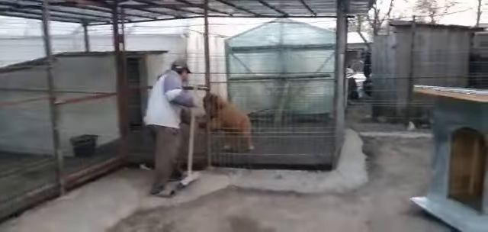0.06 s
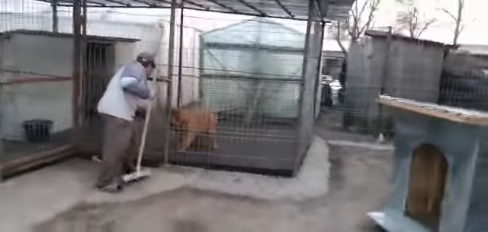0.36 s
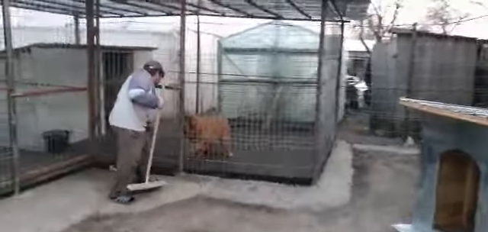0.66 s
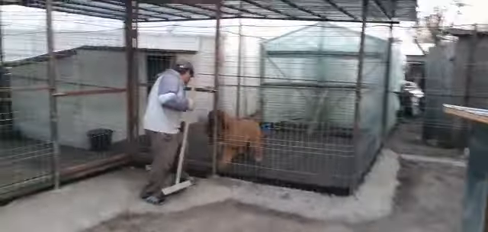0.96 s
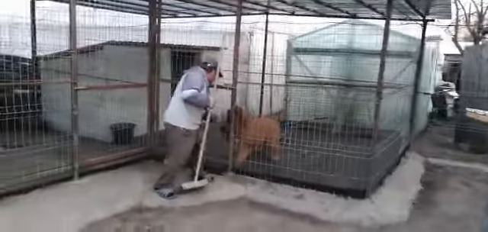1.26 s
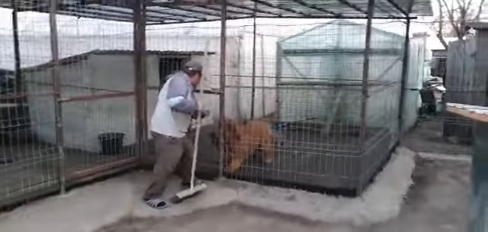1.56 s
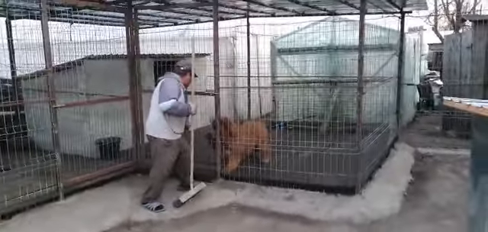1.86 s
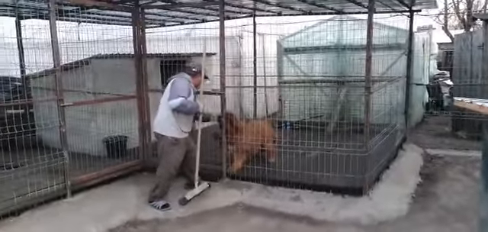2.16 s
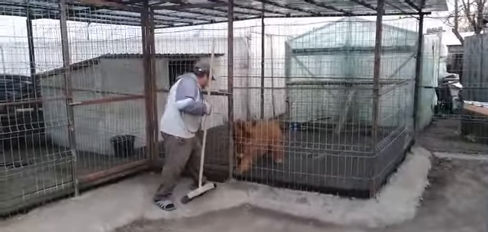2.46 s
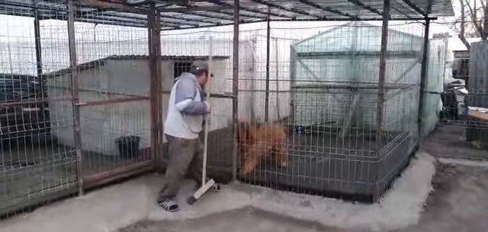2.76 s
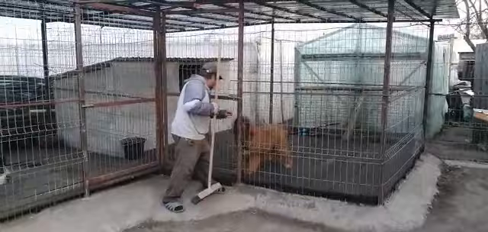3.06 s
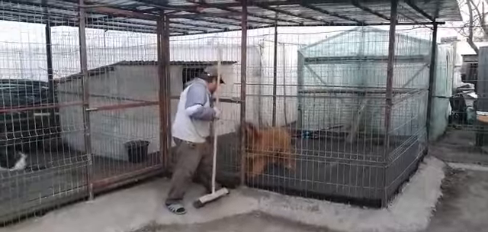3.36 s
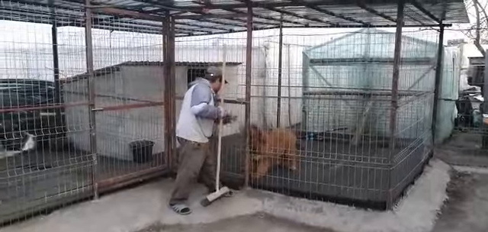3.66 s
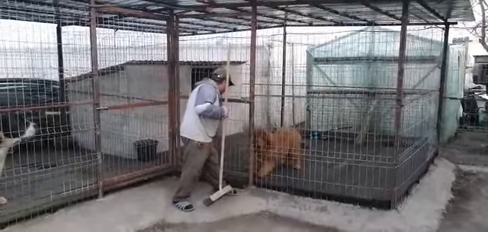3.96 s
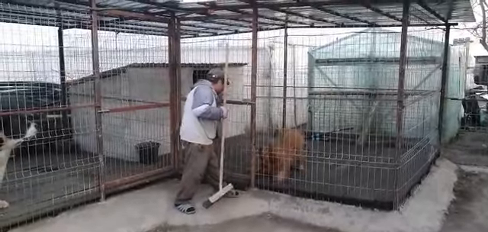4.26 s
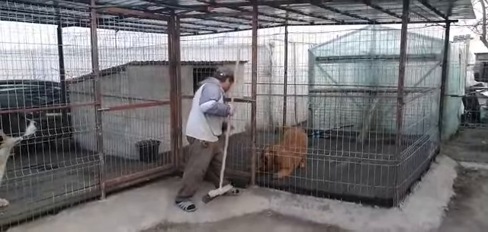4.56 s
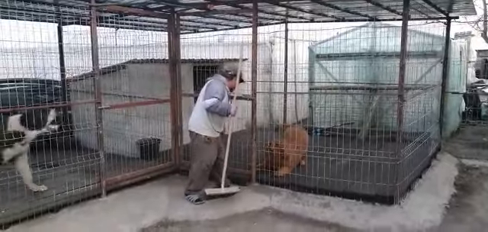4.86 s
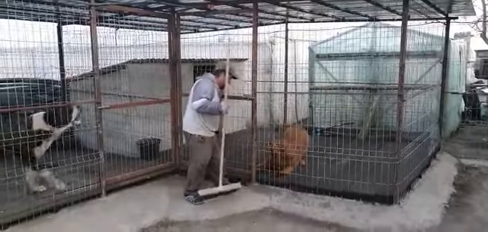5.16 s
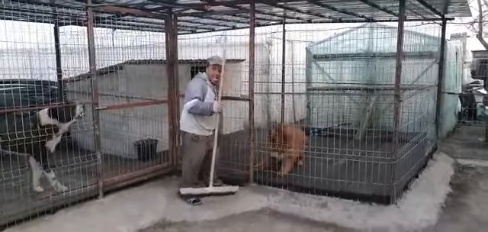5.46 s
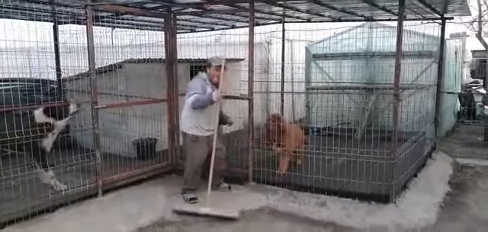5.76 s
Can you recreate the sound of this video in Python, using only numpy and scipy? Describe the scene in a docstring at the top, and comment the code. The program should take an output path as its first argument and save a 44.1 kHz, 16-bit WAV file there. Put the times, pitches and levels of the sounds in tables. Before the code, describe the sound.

Loud, repeated dog barks outdoors, joined halfway by a lower dog, while another animal squeals briefly and a broom softly scrapes concrete.

```python
"""Dogs at a kennel fence. First one deep woof: uneven puffs ring a chest. From 0.5 s a large dog barks
hard, its vocal-fold overtones shaped by throat, jaw and tongue. From 2.4 to 4.4 s a third animal squeals
on the right; at 2.9 s a second, lower dog joins, and the two bark over each other to the end.
Throughout, feet and a broom scuff concrete, the fence ticks, and walls and roof answer at two spaced
microphones."""
import sys
import numpy as np
from scipy import signal
from scipy.fft import rfft, irfft, next_fast_len
from scipy.io import wavfile
from scipy.ndimage import uniform_filter1d, minimum_filter1d, map_coordinates

SR = 44100
rng = np.random.default_rng(int(sys.argv[2]) if len(sys.argv) > 2 else 0)


def int16_out(signal):
    """Quantize to a 16-bit WAV file."""
    q = np.round(np.clip(np.atleast_2d(signal).T, -1, 1) * 32767)
    wavfile.write(sys.argv[1], SR, q.astype(np.int16))


N = 265923
TIME = np.arange(N) / SR


def barks(calls, throat, jaw_db, jaw_width_hz, tongue_db, tongue_width_hz,
          cliff_db, ragged_hz, jitter, hiss_db, thud_db):
    """Fold overtones through throat, jaw and tongue, plus hiss; slack at both ends, tense between."""
    # air past the teeth; chest shaken by a rough bark: freq_hz, density_db
    teeth = [(2000, -6.5), (3400, -9.5), (5400, 8.5), (7100, -0.5), (8500, -9.5), (10500, -14.5),
             (15500, -14)]
    chest_thud = [(80, -41), (130, 4.5), (170, 12.5), (260, 1.5), (400, -40.5)]
    opening_db, closing_db, sag_db_per_s = -20.5, -17.5, -38.5
    pitch_drop, jaw_drop, slack_rough, hoarse_db = .23, .61, .48, -7.5
    out, shake, air = np.zeros(N), np.zeros(N), noise(teeth)[0]
    harmonics = np.arange(1, 17)[:, None]
    for (start_s, attack_s, hold_s, release_s, opening_hz, top_hz, climb_s,
         level_db, held_jaw_hz, tongue_hz, held_bright_db, rasp_db, held_rough) in calls:
        at, t, gate = span(start_s, start_s + attack_s + hold_s + 1.3 * release_s)
        age_s = t - start_s
        opening, closing = gesture(age_s, attack_s, hold_s, release_s)
        slack = np.minimum(opening + closing, 1)
        sag_db = sag_db_per_s * np.maximum(age_s - attack_s, 0)  # breath runs out
        envelope = gate * amp(level_db + opening_db * opening + closing_db * closing + sag_db)
        rough = np.clip(held_rough + (1 - held_rough) * slack_rough * slack, 0, .98)
        pitch_hz = climb(age_s, opening_hz, top_hz, climb_s)
        pitch_hz *= 1 - pitch_drop * np.minimum(closing, 1) ** 1.44
        phase = cycles(t, pitch_hz, jitter * (.24 + 2.44 * rough))

        hz = harmonics * pitch_hz
        jaw_hz = held_jaw_hz * (1 - jaw_drop * slack ** 4)
        mouth_db = jaw_db / (1 + ((hz - jaw_hz) / jaw_width_hz) ** 2)
        mouth_db += tongue_db / (1 + ((hz - tongue_hz) / tongue_width_hz) ** 2)
        mouth_db += cliff_db * np.clip((hz - tongue_hz - 100) / 450, 0, 1)
        bright_db = held_bright_db + 3.5 * opening - 12 * closing  # starts pressed, ends dull
        pressed_db = bright_db * np.clip(np.log2(hz / 800), 0, 1)
        gains = amp(along(throat, hz) + mouth_db + pressed_db)
        gains /= np.linalg.norm(gains, axis=0)
        smears = 1 - (1 - rough) ** (.45 + (hz / ragged_hz) ** 2)  # high overtones break up first
        voice = sum(gain * partial(t, k * phase + rng.uniform(0, 2 * np.pi), smear, flutter_hz=258.9)
                    for k, (gain, smear) in enumerate(zip(gains, smears), 1))

        jaw_ring = partial(t, 2 * np.pi * np.cumsum(jaw_hz) / SR, .95, flutter_hz=310)  # turbulence
        voice += amp(hoarse_db) * rough * jaw_ring
        doubling = np.cos(phase / 2 + wobble(t, 63))  # strained folds alternate strong and weak cycles
        voice *= (1 + .8 * rough * doubling) * amp(3.5 * rough * wobble(t, 110))
        hiss = amp(rasp_db + hiss_db + 4.5 * slack) * air[at] * (1 + .16 * np.cos(phase))
        out[at] += envelope * (voice + hiss)
        shake[at] += envelope * rough
    from_mouth = filtered(out, lambda hz: 1 - 1 / (1 + (hz / 235) ** 8))  # bass leaves only by the chest
    return from_mouth + amp(thud_db) * shake * noise(chest_thud)[0]


def woof(breath_db):
    """Slow, uneven puffs and hoarse air ring a deep chest and a nearly closed mouth."""
    # course of the woof: time_s, pitch_hz, level_db
    contour = [(.07, 99.17, -51.5), (0.121, 117.1, -25.5), (.155, 123.5, -9.5), (0.184, 125.1, -11),
               (.215, 113.4, -15), (0.248, 100.7, -20.5), (0.298, 89, -30.5)]
    # chest response; breath spectrum: freq_hz, gain_db
    chest = [(150, -47), (300, -10), (420, 0), (520, 3.5), (620, 3.5), (760, -7.5), (880, -20.5),
             (1030, -10), (1400, -39), (2000, -36), (2400, -46), (3100, -45), (4500, -37.5), (6000, -39),
             (9000, -48.5), (15000, -59)]
    breath = [(1700, -26.5), (2250, -9), (2500, -4), (3100, -20), (4000, -35.5)]
    at, t, gate = span(contour[0][0], contour[-1][0])
    pitch_hz, level_db = curves(contour, t)
    puffs = unit(((1 + np.cos(cycles(t, pitch_hz, jitter=.25))) / 2) ** 30)
    source, out = np.zeros(N), np.zeros(N)
    source[at] = 18 * np.diff(puffs, prepend=0) + 2.6 * (2.43 + puffs) * rng.standard_normal(N)[at]
    body = unit(filtered(source, lambda hz: amp(along(chest, hz)))[at])
    opening_rasp = noise(breath)[0, at] * np.exp(-((t - .14) / .03) ** 2)
    body *= amp(1.3 * wobble(t, 130))
    out[at] = gate * (amp(level_db) * body + amp(breath_db) * opening_rasp)
    return out


def squeals(slip_hz):
    """A shrill squeal over a lower yelp; as it turns hoarse, the pitch slips and air rushes through."""
    # squeals: start_s, attack_s, release_s, opening_hz, top_hz, climb_s, level_db,
    # yelp_top_hz, yelp_start_db, roughness
    calls = [ (2.422, 0.069, 0.12, 1440, 1906, 0.15, -24, 842, -19, 0.56),
             (2.712, 0.037, 0.16, 1380, 2074, 0.13, -24, 826, -19.5, 0.71),
             (3.075, 0.018, 0.14, 1430, 2100, 0.079, -31, 740, -51, 0.71),
             (3.445, 0.039, 0.11, 1400, 2270, .115, -29.5, 854, -23, 0.9),
             (4.205, 0.035, 0.11, 1638, 2312, 0.058, -35, 579, -36, 0.17)]
    # second harmonic re the fundamental: freq_hz, gain_db
    octave = [(2600, -17), (3150, -4.5), (3650, -36), (4150, -10.5), (4650, -15.5), (5200, -20)]
    # rushing air: freq_hz, density_db
    breath = [(1250, -50), (1650, 11.5), (1950, -3), (2300, -7.5), (3100, -14.5), (4200, -17.5),
              (6000, -43.5)]
    opening_db, closing_db, yelp_fade_db_per_s, hoarse_onset_s = -15, -20, -240, .04
    out, air = np.zeros(N), noise(breath)[0]
    for (start_s, attack_s, release_s, opening_hz, top_hz, climb_s, level_db,
         yelp_top_hz, yelp_start_db, roughness) in calls:
        at, t, gate = span(start_s, start_s + attack_s + release_s)
        age_s = np.maximum(t - start_s, 0)
        opening, closing = gesture(age_s, attack_s, 0, release_s)
        shrill_hz = climb(age_s, opening_hz, top_hz, climb_s)
        shrill_db = level_db + opening_db * opening + closing_db * closing
        rough = roughness * (1 - np.exp(-age_s / hoarse_onset_s))
        slip = np.cumsum(slip_hz * np.exp(.12 * wobble(t, 52))) / SR % 1 - .5
        phase = cycles(t, shrill_hz * (1 + .45 * np.minimum(rough, .5) * slip), jitter=.06 * rough)
        shrill = partial(t, phase, rough, flutter_hz=580)
        shrill += amp(along(octave, 2 * shrill_hz)) * partial(t, 2 * phase, rough, flutter_hz=510)
        shrill = (1 - .5 * rough) * shrill + rough * air[at]
        yelp_hz = yelp_top_hz * (shrill_hz / top_hz) ** .75
        yelp_db = yelp_start_db + yelp_fade_db_per_s * age_s
        yelp = partial(t, cycles(t, yelp_hz, jitter=.089), rough, flutter_hz=290)
        flicker = amp(8.2 * rough * wobble(t, 65))
        out[at] += gate * flicker * (amp(shrill_db) * shrill + amp(yelp_db) * yelp)
    return out


def fence_ticks(trim_db, t60_s):
    """Each light contact is a short gritty burst around its own pitch."""
    # knocks and scrapes: start_s, level_db (before trim_db), centre_hz
    contacts = [(0.328, -56.5, 1150), (0.412, -28, 2590), (0.986, -30, 5200), (1.5835, -29, 4000),
                (2.5837, -38, 2000), (4.3135, -47, 2320), (5.433, -26.5, 1554)]
    out, t = np.zeros(N), np.arange(SR // 8) / SR
    for start_s, level_db, centre_hz in contacts:
        band = signal.butter(2, [centre_hz / 1.5, centre_hz * 1.5], 'band', fs=SR)
        burst = unit(signal.lfilter(*band, rng.standard_normal(len(t))))
        out[round(start_s * SR):][:len(t)] += amp(level_db + trim_db - 60 * t / t60_s) * burst
    return out


def steps(t60_s):
    """A foot lands with a short dull thump."""
    # footfalls: start_s, level_db, pitch_hz
    footfalls = [(1.641, -24.5, 125.4), (1.697, -27.5, 93), (1.925, -22, 64.4), (3.491, -26.5, 95)]
    out, t = np.zeros(N), np.arange(SR // 4) / SR
    for start_s, level_db, pitch_hz in footfalls:
        envelope = amp(level_db - 60 * t / t60_s) * (1 - np.exp(-t / .0032))
        out[round(start_s * SR):][:len(t)] += envelope * np.sin(2 * np.pi * pitch_hz * t)
    return out


def scuffs(shuffle_db):
    """Feet and broom rub gritty concrete in strokes, with faint shuffling between."""
    # strokes: peak_s, swell_s, fade_s, level_db
    strokes = [(.03, 0.064, 0.13, -51), (.65, 0.26, 0.13, -47), (1.061, .08, 0.23, -45),
               (1.269, 0.19, 0.28, -47), (1.64, 0.048, 0.19, -49.5), (2.478, .05, 0.11, -39.5),
               (2.979, 0.19, 0.067, -40.5), (3.78, 0.1, 0.076, -35), (4.11, 0.052, 0.12, -42.5),
               (4.599, 0.26, 0.18, -42.5), (5.049, 0.24, .1, -51.5), (5.38, 0.1, .13, -31.5),
               (5.73, 0.11, 0.078, -35), (5.929, 0.048, 0.023, -31)]
    # grit on concrete: freq_hz, density_db
    grit = [(300, 13), (900, 16), (2200, 2), (3500, 0.5), (6500, 2.5), (8500, -10), (12000, -15),
            (15500, -16)]
    rubbing = np.zeros(N)
    for peak_s, swell_s, fade_s, level_db in strokes:
        off_peak = np.maximum((peak_s - TIME) / swell_s, (TIME - peak_s) / fade_s)
        rubbing += amp(level_db - 6 * off_peak ** 2.7)
    shuffle = amp(shuffle_db + .67 * wobble(TIME, 3.3))
    return np.hypot(rubbing, shuffle) * amp(2 * wobble(TIME, 130)) * noise(grit, channels=2)


def outdoor_air(hush_db, rumble_db):
    """Soft air rumbles on the microphones over a steady outdoor hush."""
    # air on the microphones; outdoor hush: freq_hz, density_db
    air = [(20, -26.5), (45, -7), (70, 2.5), (120, -1.5), (200, -3.5), (400, -12.5), (1000, -49),
           (3000, -58)]
    hush = [(200, 2.5), (600, 8.5), (1500, -3), (3000, -8), (6800, -19.5), (8000, -34), (15000, -72.5)]
    rumble = unit(noise(air) + .6 * noise(air, channels=2)) * amp([[1], [-1]])
    return amp(hush_db) * noise(hush, channels=2) + amp(rumble_db + wobble(TIME, 53)) * rumble


def kennel(x, lead, pan_db, scatter_db, wet_db):
    """Direct sound at two microphones (pan_db > 0: left), quick fence scatter, then walls and roof."""
    # decay of walls and roof: freq_hz, t60_s
    decay = [(200, 1), (500, 0.42), (1500, 0.37), (3000, 1), (7000, 0.37), (14000, 0.27)]
    scatter_hz, scatter_t60_s = 2410, .057  # thin bars scatter the treble
    sides = np.array([[1], [-1]])
    direct = filtered(x, lambda hz: amp(sides * pan_db * np.minimum(hz / 2000, 1) / 2)
                      * np.exp(.5j * sides * along(lead, hz)))
    hz, t, white = signal.stft(rng.standard_normal((2, SR // 2)), SR, nperseg=256)
    tail_shape = amp(-60 * t / along(decay, hz)[:, None]) * (1 - np.exp(-t / .0086))
    scatter_shape = amp(-60 * t / scatter_t60_s) * np.minimum(hz / scatter_hz, 1)[:, None] ** 2
    response = 0
    for level_db, shape in (wet_db, tail_shape), (scatter_db, scatter_shape):
        echoes = signal.istft(white * shape, SR, nperseg=256)[1]
        response += amp(level_db) * echoes / np.linalg.norm(echoes[0])
    return direct + signal.fftconvolve(x[None], response, axes=1)[:, :N]


def gesture(age_s, attack_s, hold_s, release_s):
    """How far a call has yet to open (1 to 0) and how far it has closed (0 to 1 and beyond)."""
    return np.clip(1 - age_s / attack_s, 0, 1), np.maximum((age_s - attack_s - hold_s) / release_s, 0)


def climb(age_s, opening_hz, top_hz, climb_s):
    """Pitch shoots up as the breath builds, then levels off."""
    return top_hz - (top_hz - opening_hz) * np.clip(1 - age_s / climb_s, 0, 1) ** 1.6


def cycles(t, pitch_hz, jitter):
    """Vocal-fold phase: a rounded, trembling pitch arch."""
    arch_hz = uniform_filter1d(pitch_hz, SR // 70, mode='nearest')
    return 2 * np.pi * np.cumsum(arch_hz * (1 + jitter * wobble(t, 222))) / SR


def partial(t, phase, rough, flutter_hz):
    """One overtone; rough (0-1) trades its steady tone for the smear of chaotic vibration."""
    rough = np.clip(rough, 0, 1)
    steady = np.sqrt(2 * (1 - rough)) * np.cos(phase)
    smear = wobble(t, flutter_hz) * np.cos(phase) + wobble(t, flutter_hz) * np.sin(phase)
    return steady + np.sqrt(rough) * smear


def span(start_s, end_s):
    """A call's sample indices, times and soft-ended gate."""
    at = np.flatnonzero((TIME > start_s - .01) & (TIME < end_s + .01))
    t = TIME[at]
    return at, t, np.clip(np.minimum(.35 + (t - start_s) / .016, 1 + (end_s - t) / .01), 0, 1)


def wobble(t, rate_hz):
    """Smooth random curve, rate_hz knots a second."""
    return map_coordinates(rng.standard_normal(1024), [(t - t[0]) * rate_hz], mode='wrap')


def noise(spectrum, channels=1):
    """Coloured noise, rms 1."""
    return unit(filtered(rng.standard_normal((channels, N)), lambda hz: amp(along(spectrum, hz))))


def filtered(x, response):
    """x through a complex frequency response."""
    size = next_fast_len(N + SR // 4)
    return irfft(rfft(x, size) * response(np.fft.rfftfreq(size, 1 / SR)), size)[..., :N]


def along(points, hz):
    """Interpolate (freq_hz, value) points on a log axis."""
    freq_hz, values = np.transpose(points)
    return np.interp(np.log(hz + 1), np.log(freq_hz + 1), values)


def curves(rows, t):
    """Each column after time_s, read at t."""
    time_s, *columns = np.transpose(rows)
    return [np.interp(t, time_s, column) for column in columns]


def amp(db):
    return 10 ** (np.asarray(db) / 20)


def unit(x):
    return x / np.sqrt(np.mean(np.abs(x) ** 2) + 1e-20)


def scene():
    """The barking dogs stand left of the microphones' axis, the squealer to the right."""
    # barks: start_s, attack_s, hold_s, release_s, opening_hz, top_hz, climb_s, level_db,
    # jaw_hz, tongue_hz, bright_db, rasp_db (re level, before hiss_db), roughness
    high_calls = [ (.51, 0.034, 0.049, 0.031, 270, 388, 0.063, -23.5, 520, 2694, 10.5, -30.5, 0.33),
                  (.818, 0.038, 0.043, 0.054, 316, 507, 0.046, -7.5, 930, 2370, 10, -34.5, 0.03),
                  (1.08, 0.035, 0.068, 0.045, 315, 495, 0.05, -11, 820, 2574, 7, -31.5, 0.06),
                  (1.36, 0.035, .022, 0.056, 245, 340.2, 0.076, -15.5, 623, 2680, 16, -37.5, 0.09),
                  (1.73, 0.045, 0.03, 0.058, 243, 301.5, 0.044, -19, 778, 2505, 20, -35.5, 0.22),
                  (2.016, 0.044, 0.038, .055, 400, 439.5, 0.069, -15.5, 1103, 2582, 10, -30.5, 0.51),
                  (2.296, 0.057, 0.019, 0.066, 346.3, 424.2, 0.049, -12.5, 1108, 2518, 11.5, -33.5, 0.42),
                  (2.8, 0.061, 0.038, 0.053, 230.5, 497, 0.097, -6.5, 871, 2283, 18, -31, 0.3),
                  (3.115, .052, .045, 0.058, 254.5, 471.8, 0.085, -10.5, 615, 2376, 11, -32, 0.14),
                  (3.53, 0.033, 0.056, 0.049, 314.8, 496, 0.062, -12, 907, 2580, 4.5, -38, 0.22),
                  (3.808, 0.047, 0.034, 0.051, 307.6, 499.5, 0.057, -7.5, 770, 2630, 3, -35.5, 0.1),
                  (4.353, .06, .032, 0.031, 323, 471.2, .068, -3, 972, 2520, 0, -32.5, 0),
                  (4.656, 0.074, 0.033, 0.041, 240.2, 458.5, 0.062, -3.5, 915, 2340, 9.5, -31.5, 0.03),
                  (4.985, 0.062, 0.071, 0.033, 284, 455.3, 0.086, -11.5, 934, 2510, -16, -21.5, 0.56),
                  (5.28, 0.063, 0.035, 0.043, 327.4, 458.4, 0.072, -9.5, 980, 2360, 0.5, -53.5, 0.08),
                  (5.67, 0.051, 0.088, 0.04, 381.6, 451.7, 0.054, -7.5, 830, 1950, 4, -26.5, 0.69),
                  (5.87, 0.027, 0.079, 0.047, 368, 489, 0.054, -17, 617, 2020, -11, -27.5, 0.94)]
    low_calls = [ (2.892, 0.037, 0.0461, 0.058, 299.5, 366.5, 0.0508, -9, 830, 2660, -4, -31, 0.3),
                 (3.492, 0.05, 0.087, 0.047, 216.2, 369.7, 0.088, -6, 582, 2480, 0.5, -36.5, 0.053),
                 (3.892, 0.038, 0.035, .06, 349, 399, 0.059, -3.5, 995, 1926, 5.5, -26, 0.076),
                 (4.72, .034, .08, .06, 260, 401, 0.11, -4.5, 802, 1985, -3, -31.5, 0.15),
                 (4.95, 0.04, 0.13, .07, 255.6, 395.6, 0.11, -7.5, 774, 2210, 3.5, -33, 0.25),
                 (5.225, 0.049, .055, 0.079, 263.5, 375.9, 0.076, -7, 580, 2900, -3.5, -37, 0.035),
                 (5.566, 0.055, .16, .075, 256, 386.9, 0.15, -7, 703, 1840, 0.5, -35.5, 0.14),
                 (5.895, 0.058, 0.066, .04, 250, 353.3, 0.12, -8, 850, 1920, -7, -28, 0.078)]
    # throat responses: freq_hz, gain_db
    high_throat = [(130, -47), (250, 6), (340, 3.5), (440, 4.5), (560, 9), (780, -1.5), (920, 5),
                   (1400, -3), (1900, -15), (2600, -24), (4000, -31), (5500, -78.5), (8000, -53.5)]
    low_throat = [(130, -45), (250, 3), (330, 0), (378, 8.5), (430, -9.5), (520, 0.5), (660, 5), (780, 3.5),
                  (1030, 2), (1400, -6), (1900, -13.5), (2600, -39), (4000, -31.5), (5500, -68)]
    # directions, as phase between the microphones: freq_hz, left_lead_rad
    high_lead = [(100, -3.5), (320, 1.9), (460, 0.49), (650, 1.5), (950, 2.5), (1350, 2.0), (1750, 4.5),
                 (2400, 4.5), (3500, 3.5), (7000, 12.5), (15000, 22.5)]
    low_lead = [(100, -2), (350, 1.84), (480, 0.48), (700, 2), (950, 4), (1300, 2.5), (1750, 4.5),
                (2400, 1.8), (3500, 3), (7000, 12), (15000, 20)]
    squeal_lead = [(100, .5), (750, -2), (1800, -2.5), (4000, -6)]
    high_dog = barks(high_calls, high_throat, jaw_db=12.5, jaw_width_hz=94,
                     tongue_db=17.5, tongue_width_hz=27, cliff_db=-15.5,
                     ragged_hz=1490, jitter=.02, hiss_db=-4.5, thud_db=-45.5)
    low_dog = barks(low_calls, low_throat, jaw_db=9, jaw_width_hz=440,
                    tongue_db=8, tongue_width_hz=46, cliff_db=-4.5,
                    ragged_hz=1400, jitter=.029, hiss_db=-8, thud_db=-18)
    mix = kennel(high_dog, high_lead, pan_db=1.5, scatter_db=2, wet_db=-18.5)
    mix += kennel(low_dog, low_lead, pan_db=-1.5, scatter_db=5.5, wet_db=-14.5)
    mix += kennel(woof(breath_db=-39.5), low_lead, pan_db=-6, scatter_db=.5, wet_db=-17.5)
    knocks = fence_ticks(trim_db=-17.5, t60_s=.12) + steps(t60_s=.11)
    mix += kennel(knocks, low_lead, pan_db=-3.5, scatter_db=-5, wet_db=-6)
    mix += kennel(squeals(slip_hz=89), squeal_lead, pan_db=-.5, scatter_db=-2.5, wet_db=-11.5)
    return mix + scuffs(shuffle_db=-66.5) + outdoor_air(hush_db=-49.5, rumble_db=-48)


def record(dry):
    """Two microphones of unequal colour, a fast limiter, a band limit."""
    # microphone mismatch: freq_hz, left_minus_right_db
    tilt = [(60, 1.5), (200, -2.5), (450, 0.5), (750, -2), (1300, -3), (2400, -6), (4400, -7), (8000, 2.5),
            (14000, 3.5)]
    ceiling, window, top_hz = .96, SR // 100, 15760
    picked_up = filtered(dry, lambda hz: amp(np.array([[1], [-1]]) * along(tilt, hz) / 2))
    needed_gain = np.minimum(1, ceiling / (np.abs(picked_up).max(axis=0) + 1e-9))
    gain = uniform_filter1d(minimum_filter1d(needed_gain, window), window)
    return filtered(picked_up * gain, lambda hz: hz < top_hz)


dry = scene()
out = record(dry)
int16_out(out)
```